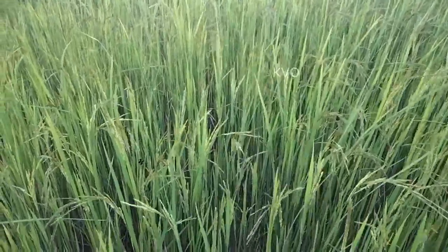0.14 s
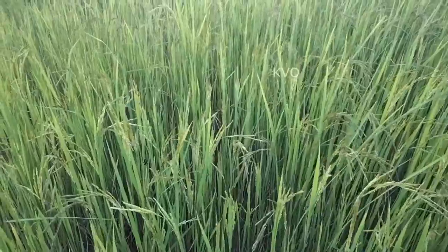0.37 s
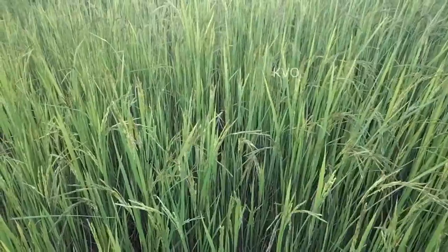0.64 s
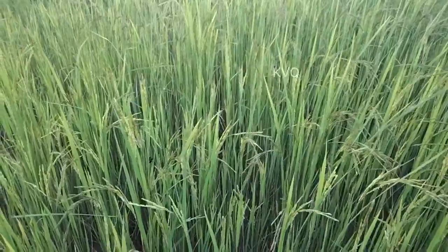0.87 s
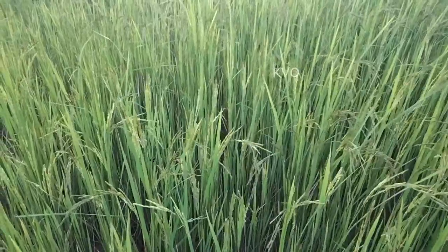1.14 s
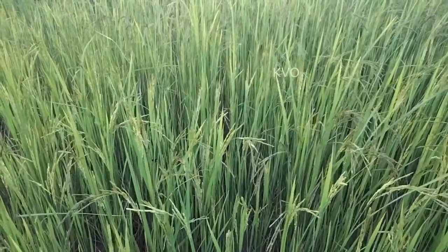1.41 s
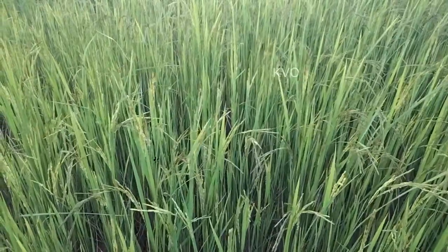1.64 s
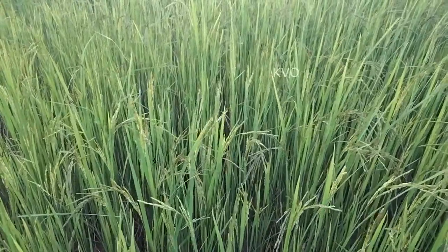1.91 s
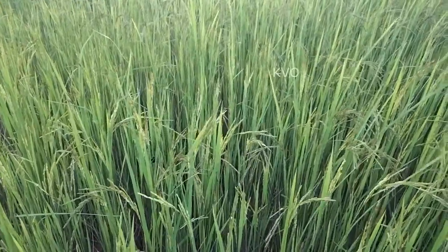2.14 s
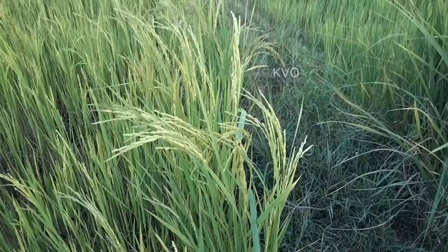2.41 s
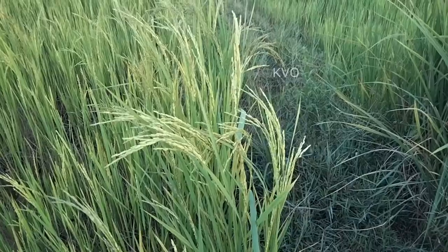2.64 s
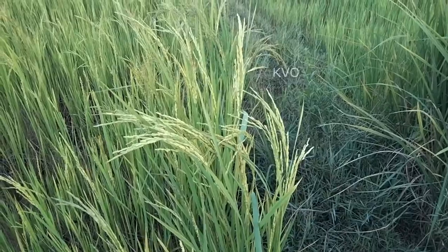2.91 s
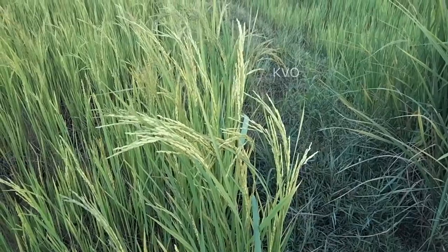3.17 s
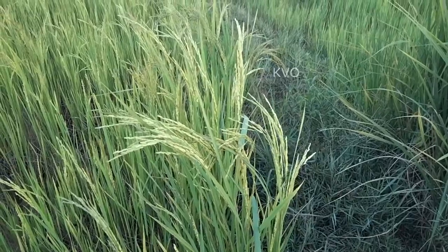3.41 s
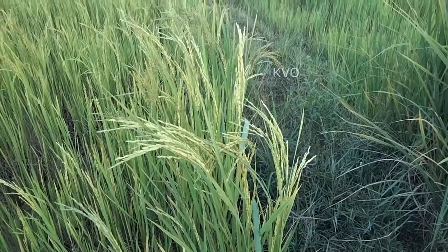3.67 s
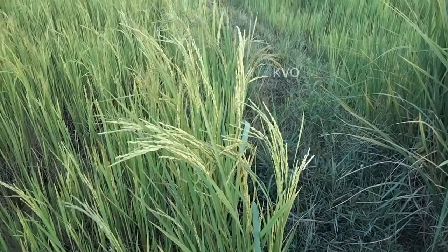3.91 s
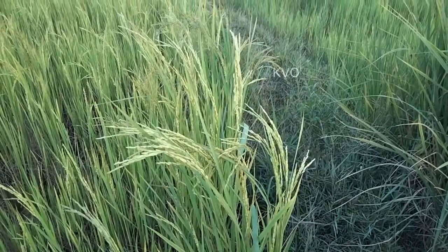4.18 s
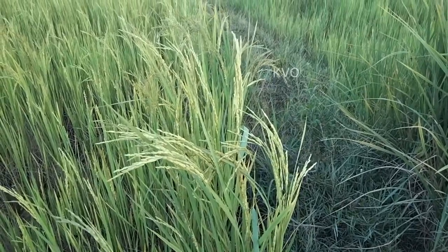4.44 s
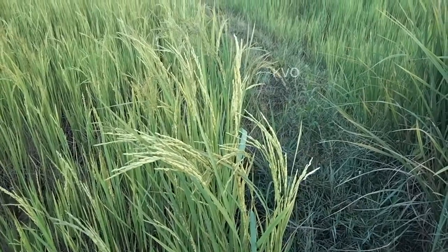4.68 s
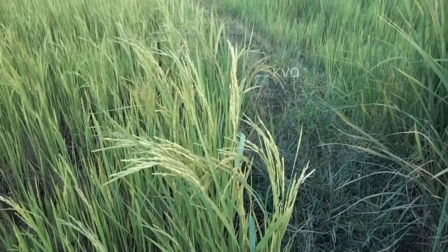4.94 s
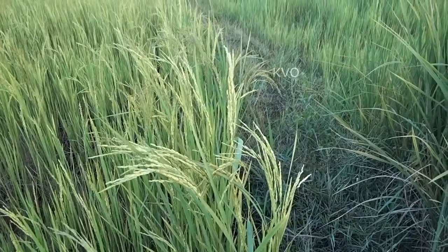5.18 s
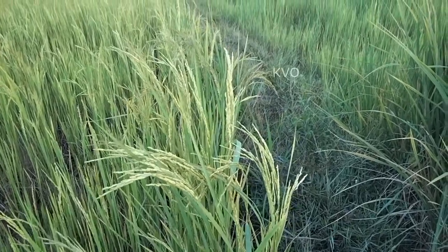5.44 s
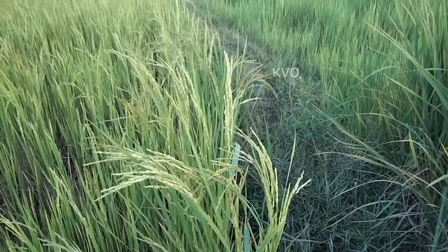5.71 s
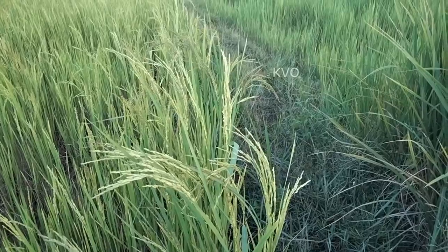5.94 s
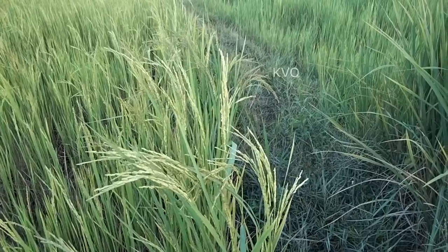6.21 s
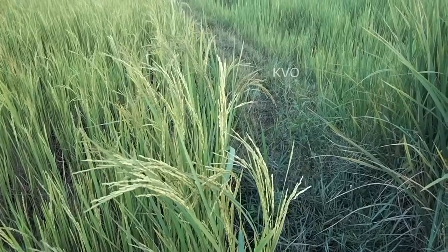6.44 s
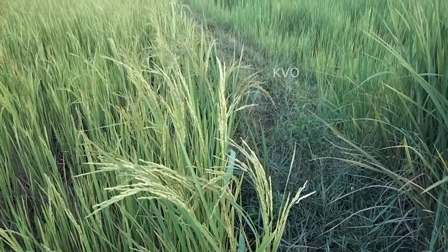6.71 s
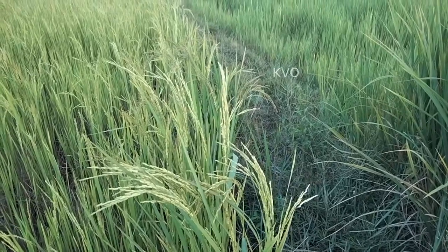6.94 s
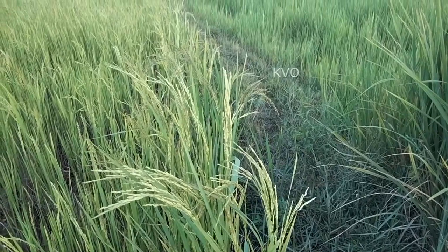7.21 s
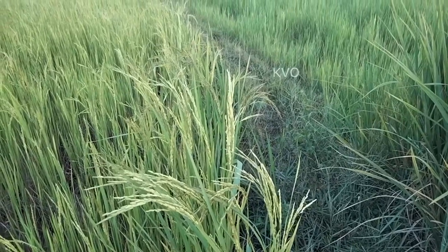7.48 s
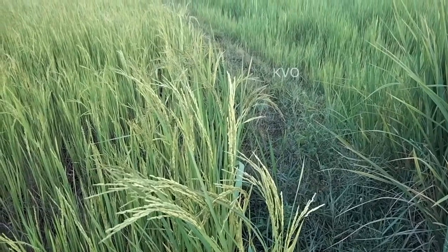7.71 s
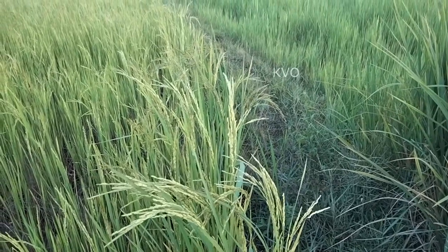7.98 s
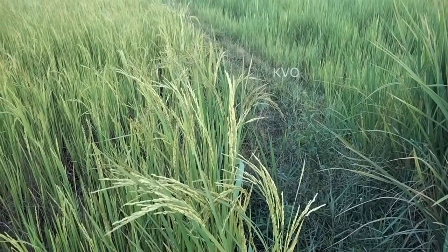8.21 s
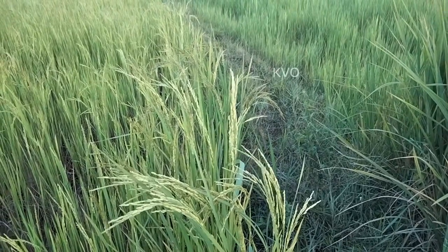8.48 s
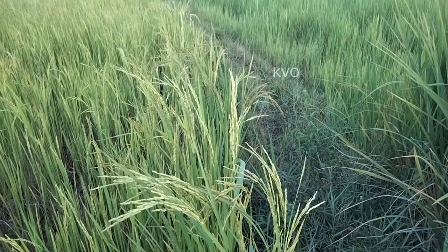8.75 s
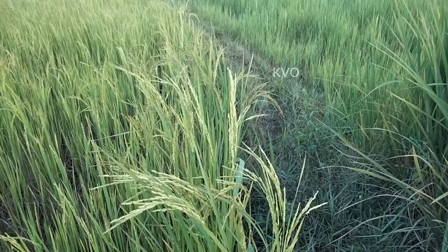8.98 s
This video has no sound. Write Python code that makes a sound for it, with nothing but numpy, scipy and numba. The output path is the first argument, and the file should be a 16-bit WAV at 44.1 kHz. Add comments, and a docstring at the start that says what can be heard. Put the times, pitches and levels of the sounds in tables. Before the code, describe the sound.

Wet field murmur with ticking drips and soft plops, as overlapping birds whistle, screech, rasp and tumble through song, ending in a rapid trill.

```python
"""A murmur of wet fields and a quick falling whistle, then a bird chorus: whistles, low coos, screeches,
rasps, a tumbling song and a closing trill. Drips, plops and splashes close by; a slow engine thumps far off.
Clear voices are gliding sines with overtones, hoarse ones chopped noise through resonances, water decaying
sines, the engine filtered impulses. Hedges and banks smear calls and water with short echoes."""
import sys
import numpy as np
from scipy import signal
from scipy.fft import rfft, irfft, next_fast_len
from scipy.io import wavfile
from scipy.ndimage import uniform_filter1d
from numba import njit

SR = 44100
rng = np.random.default_rng(int(sys.argv[2]) if len(sys.argv) > 2 else 0)


def digitize_waveform(pressure):
    """Quantize a signal to 16-bit integers and store it at the path in sys.argv[1].

    Rows of a 2-D input are taken as channels; values are limited to [-1, 1].
    """
    field = np.atleast_2d(pressure).T
    bounded = np.clip(field, -1, 1)
    quanta = np.round(bounded * 32767).astype(np.int16)
    wavfile.write(sys.argv[1], SR, quanta)


def voltage_ratio(level):
    """Linear amplitude factor for a level in decibels (scalar or array-like)."""
    return 10 ** (np.asarray(level, float) / 20)


N = 401751
t = np.arange(N) / SR

# field murmur spectrum: (frequency [Hz], relative density [dB per Hz])
FIELD_SPECTRUM = [(24, -36), (40, -25.5), (98, -3), (281, -12.5), (821, -23.5), (1090, -3.5), (1270, -12),
                  (1420, -3), (2680, -7.5), (5770, -17.5), (7500, -15.5), (9750, -43.5), (16500, -120)]
# far engine: (time [s], firing rate [1/s], level [dB])
ENGINE_COURSE = [(0.0, 5.94, -78), (1.98, 5.7, -64), (4.2, 9.0, -53), (5.0, 10.7, -64), (6.49, 13.9, -78),
                 (6.57, 11.1, -56), (6.95, 11.05, -56), (7.15, 11.0, -66), (9.11, 10.8, -63)]
# engine rumble: (time [s], level [dB])
RUMBLE_COURSE = [(0, -49), (.6, -48), (1.3, -55.5), (2.0, -61), (3.9, -60), (4.5, -54.5), (5.75, -50.5),
                 (5.85, -60), (9.11, -58)]
# clear whistles: (2nd harmonic re voice [dB], [(time [s], pitch [Hz], level [dB])])
WHISTLE_CALLS = [ (-25, [(0, 2930, -21), (0.06, 2680, -52), (0.18, 2626, -44)]), (-22, [(0, 2137, -27.5),
                 (0.07, 2150, -49), (0.2, 2300, -49)]), (-15, [(0.02, 980, -55), (0.06, 940, -43.5),
                 (0.13, 893, -47)]), (-35, [(0.82, 3060, -38), (0.85, 4500, -36), (0.89, 5300, -34),
                 (0.92, 4600, -30), (0.95, 4100, -42), (0.975, 3100, -44)]), (-40, [(1.25, 3600, -44),
                 (1.266, 3000, -26), (1.29, 2500, -40)]), (-35, [(3.845, 2600, -44), (3.87, 2270, -24.5),
                 (3.9, 1942, -18), (3.93, 1757, -26), (3.96, 1509, -25), (4.03, 1343, -21),
                 (4.1, 1344, -19.5), (4.2, 1322, -24), (4.3, 1368, -46)]), (-20, [(7.69, 3100, -36),
                 (7.72, 2592, -26), (7.77, 2700, -21), (7.81, 2860, -27), (7.835, 2740, -47)]),
                 (10, [(7.84, 1308, -48), (7.88, 1376, -37), (7.91, 1295, -33), (7.95, 1250, -46),
                 (7.985, 1206, -33)]), (-22, [(7.975, 2740, -18), (8.0, 3320, -28), (8.025, 3735, -16),
                 (8.06, 3860, -19.5), (8.1, 3730, -23)]), ]
# louder bubbles: (time [s], level [dB], start pitch [Hz], time to rise an octave [s])
LOUD_PLOPS = [(.785, -38.5, 660, 0.046), (1.033, -34.5, 685, 0.012), (1.105, -42.5, 830, 0.15),
              (1.575, -41, 692, .02), (1.711, -33.5, 786, 0.024), (1.859, -29, 674, 0.0092),
              (3.249, -40.5, 491, 0.067), (3.289, -29.5, 583, .04), (3.666, -29, 647, 0.052),
              (4.408, -28.5, 657, 0.053), (4.586, -31, 587, 0.042), (4.688, -36.5, 606, 0.038),
              (5.445, -39.5, 573, 0.066), (6.14, -40.5, 854, 0.018), (6.174, -39.5, 775, .015),
              (6.23, -41, 655, 0.049), (6.452, -43, 664, .055), (6.67, -40, 650, 0.061),
              (6.728, -41.5, 636, .11), (7.225, -40.5, 770, 0.015), (7.279, -28, 696, 0.045),
              (7.837, -33, 690, 0.0098), (8.21, -44.5, 530, .045)]
# louder drips: (time [s], level [dB], pitch [Hz])
LOUD_DRIPS = [(0.1472, -23.5, 4400), (0.3154, -24.5, 6640), (0.3535, -25, 6050), (0.5072, -30, 5470),
              (0.879, -22, 5330), (1.2008, -22, 6300), (1.2114, -19, 5550), (1.475, -23, 6550),
              (1.5984, -23, 4000), (1.62, -25, 4000), (1.8356, -27, 5610), (1.8602, -27, 5940),
              (1.9121, -28.5, 5800), (2.143, -28, 6100), (2.204, -29.5, 6750), (2.2496, -24.5, 5600),
              (2.2779, -20.5, 5900), (2.3654, -29.5, 6860), (2.4044, -25, 4800), (2.7447, -35, 4090),
              (2.797, -34, 6060), (2.844, -30, 6400), (2.9223, -35, 6600), (3.2535, -29, 6680),
              (3.3755, -30, 6950), (3.3993, -24, 6600), (4.0985, -18.5, 5930), (4.351, -23.5, 6690),
              (4.4348, -26, 7070), (4.9229, -21, 4100), (5.1411, -17, 6000), (5.156, -23, 5140),
              (5.22, -24.5, 6000), (5.944, -19.5, 5660), (5.9832, -21.5, 5700), (6.0294, -24.5, 7070),
              (6.0746, -21, 4240), (6.3753, -19.5, 5300), (6.4118, -21.5, 5820), (6.8608, -25, 6160),
              (6.895, -25.5, 5700), (7.1455, -13, 4900), (7.6896, -27, 5900)]
# louder drops striking the hollow: (time [s], level [dB])
LOUD_KNOCKS = [(0.148, -33.5), (0.1805, -37), (0.4735, -37.5), (0.835, -34.5), (1.5346, -39.5),
               (1.5653, -33.5), (2.432, -29.5), (2.9774, -38.5), (4.6637, -31.5), (5.2639, -30),
               (5.3854, -37), (5.948, -37), (5.9873, -34), (6.1345, -36), (6.199, -32), (6.3986, -25.5),
               (6.777, -42), (6.8763, -32.5), (7.9917, -31.5), (8.4332, -34), (8.7042, -26.5), (8.996, -34)]
# far doves, a list per coo: (time [s], pitch [Hz], level [dB])
DOVE_COOS = [
    [(0.12, 387, -66.5), (0.544, 401, -47), (0.8, 371, -64)],
    [(2.13, 650, -64), (2.23, 664, -52), (2.86, 532, -72)],
    [(3.67, 670.6, -41.5), (3.826, 661.3, -71), (3.84, 659.9, -83)],
    [(4.7, 630, -62.5), (5.216, 570.5, -56), (5.25, 560, -81)],
]
# hoarse screeches: (throat width [Hz], brightness [dB], [(time [s], throat centre [Hz], level [dB])])
SCREECH_CALLS = [ (950, -7, [(0.225, 2930, -34), (0.231, 2860, -23.5), (0.25, 2880, -39)]),
                 (910, -10, [(0.262, 3030, -28), (0.294, 3230, -33), (0.305, 3030, -44)]),
                 (900, -8, [(0.32, 3110, -40), (0.36, 2870, -35.5)]), (450, -8, [(.44, 2320, -48),
                 (.56, 1900, -39), (.64, 1990, -30), (.75, 2290, -32), (.85, 1790, -36), (.95, 1710, -37)]),
                 (920, -12, [(0.96, 2970, -39.5), (1.12, 2520, -34), (1.2, 2150, -60)]),
                 (910, -3, [(1.42, 2950, -70), (1.44, 2480, -42), (1.53, 2030, -61)]),
                 (910, -5, [(3.98, 2000, -42), (4.258, 2941, -26), (4.36, 2780, -85)]),
                 (920, -16, [(8.09, 2740, -25.5), (8.182, 2680, -17.5), (8.24, 2540, -45)]),
                 (620, -16, [(8.39, 2500, -26), (8.42, 2640, -18), (8.51, 2810, -20), (8.57, 3400, -17),
                 (8.62, 3700, -26)]), (700, -20, [(8.5, 2480, -37), (8.6, 2550, -23), (8.73, 2530, -23.5),
                 (8.76, 2390, -45)]), ]
# falling call moving into its octave: (time [s], pitch [Hz], fundamental [dB], octave [dB])
FALLING_ROWS = [(1.46, 2006, -50, -40), (1.49, 2065, -35.5, -52), (1.56, 2048, -48, -47),
                (1.61, 1897, -52, -36), (1.71, 1645, -53, -35.5), (1.75, 1496, -54, -34.5),
                (1.79, 1566, -51, -50), (1.86, 1530, -48, -46)]
# rasping calls: (start [s], peak [s], end [s], peak level [dB])
RASP_CALLS = [(2.47, 2.575, 2.64, -22), (2.94, 3.085, 3.17, -18), (3.46, 3.6, 3.67, -20.5),
              (5.56, 5.7, 5.82, -21), (6.53, 6.7, 6.77, -21.5), (8.24, 8.37, 8.48, -16)]
# rasp throat resonances: (centre [Hz], width [Hz], relative level [dB])
RASP_RESONANCES = [(1250, 110, -7), (1900, 1500, -2), (2790, 100, -13), (3755, 640, 3), (5410, 1050, -2),
                   (6470, 630, -9), (9750, 4600, -9), (14400, 2000, -13)]
# low rasp resonances as the throat closes: (start [dB], peak [dB], end [dB])
RASP_LOW_DB = (-2, -10.5, -14)
# rasp resonances rising as the neck shortens: (start [ratio], peak [ratio], end [ratio])
RASP_SHIFT_RATIO = (.95, 1.03, 1.04)
# song phrases: (opening note [s], its level [dB], first tumbling note [s], last [s]); lone notes: first two
SONG_PHRASES = [(4.5933, -26, 4.6444, 4.7174), (4.9349, -22, 4.9922, 5.0659),
                (5.288, -31.5, 5.3564, 5.4396), (5.7214, -28.5, 5.771, 5.8511),
                (6.0677, -28.5, 6.1276, 6.199), (6.5207, -30, 6.5798, 6.6584), (6.936, -31, 7.0034, 7.0452),
                (7.9823, -26), (8.0994, -15.5)]
# song notes, before scatter: (climb from [Hz], climb to [Hz], plunge from [Hz], landing [Hz], warble [0-1])
SONG_NOTES = [(3750, 4150, 4100, 3300, 0.03), (3200, 4150, 4700, 2450, 0.15),
              (3210, 3500, 4200, 1950, 0.16), (2500, 3900, 3200, 2050, 0.23)]
# successive tumbling notes: (level [dB])
TUMBLE_LEVELS_DB = [-15.5, -16, -17.5]
# each climb re its note: (start [dB], middle [dB], end [dB])
CLIMB_LEVELS_DB = [(-9, -4, -8), (-7, -6, -9), (-2, -4.5, -12), (-2, -5, -12)]
# held notes closing phrases: (time [s], length [s], held pitch [Hz], level [dB], late pitch rise [Hz])
CLOSING_NOTES = [(4.735, .11, 2470, -21, 30), (5.07, .11, 2345, -23, 20), (5.435, .115, 2325, -24, 300),
                 (5.85, .115, 2345, -22, 220), (6.2, .13, 2185, -25, 250), (6.66, .13, 2230, -24, 200)]
# shape of a held note: (share of length [0-1], pitch [ratio], share of rise [0-1], relative level [dB])
HELD_SHAPE = [(0, .94, 0, -6), (.22, 1.001, 0, 1), (.52, 1.002, .05, -2), (.64, 1.003, 1, -3),
              (1, .99, .6, -40)]
# overtones of a held note re its voice: (level [dB])
HELD_OVERTONES_DB = [-20, -26, -22, -36, -24]
# arching cry: (time [s], pitch [Hz], level [dB])
BRIGHT_ROWS = [(7.08, 2200, -30), (7.13, 2440, -23), (7.18, 2510, -19), (7.205, 2230, -21),
               (7.245, 1672, -20), (7.3, 1439, -19), (7.33, 1700, -21), (7.37, 2330, -23),
               (7.42, 2500, -22), (7.46, 2400, -18), (7.49, 1900, -20), (7.54, 1540, -20), (7.6, 1300, -29)]
# its overtones re the voice: (level [dB])
BRIGHT_OVERTONES_DB = [1, -7, -11, -15, -12]
# its harmonics' gain by frequency, with a lift near 7.3 kHz: (frequency [Hz], gain [dB])
BRIGHT_HARMONIC_GAIN = [(1300, -11), (1700, -15), (2500, -4), (3000, 0), (4000, -4), (5000, -3), (6000, -9),
                        (7300, 3), (9000, -9), (12000, -2)]
# trill course: (time [s], lowest pitch [Hz], level [dB], upper voice [dB])
TRILL_COURSE = [(8.6, 3540, -17, -22), (8.68, 3570, -18, -18.5), (8.77, 3500, -15, -19),
                (8.79, 3050, -16, -19.5), (8.87, 2900, -13.5, -24), (8.96, 2860, -14.5, -24),
                (8.99, 3100, -14.5, -26), (9.1, 2850, -12.5, -28)]
# overall treble response: (frequency [Hz], gain [dB])
TREBLE_GAIN = [(7200, 2), (7900, -11), (12000, -14.5), (13600, -28.5), (15000, -9), (15600, -23.5),
               (15900, -75)]


@njit
def moving_resonance(x, hz, width_hz):
    """State-variable band-pass with a moving centre, gain 1 there."""
    y, b, l = np.empty(len(x)), 0., 0.
    for i in range(len(x)):
        g, k = np.tan(np.pi * hz[i] / SR), width_hz[i] / hz[i]
        v = (b + g * (x[i] - l)) / (1 + g * (g + k))
        b, l, y[i] = 2 * v - b, l + 2 * g * v, k * v
    return y


def ring(x, hz, width_hz):
    """Fixed two-pole band-pass, gain 1 at the centre."""
    g = np.tan(np.pi * hz / SR)
    damp = g * width_hz / hz
    feedback = [1 + damp + g * g, 2 * (g * g - 1), 1 - damp + g * g]
    return signal.lfilter([damp, 0, -damp], feedback, x)


def band(x, hz, width_hz):
    """Steep band-pass: a fixed or moving resonance applied twice."""
    if np.ndim(hz):
        widths_hz = width_hz + 0 * x
        return moving_resonance(moving_resonance(x, hz, widths_hz), hz, widths_hz)
    return ring(ring(x, hz, width_hz), hz, width_hz)


def unit(x):
    """Scale to rms 1."""
    return x / np.sqrt(np.mean(x ** 2))


def walk(rate_hz, size=N):
    """Smooth random wander of rms 1."""
    k = max(int(SR / rate_hz), 1)
    return unit(uniform_filter1d(uniform_filter1d(rng.standard_normal(size), k), k))


def colour(x, points):
    """Filter by (frequency [Hz], gain [dB]) points on a log axis."""
    hz, db = np.transpose(points)
    size = next_fast_len(x.shape[-1] + SR // 10)
    f = np.fft.rfftfreq(size, 1 / SR)
    gain = voltage_ratio(np.interp(np.log(f + 1), np.log(hz), db))
    return irfft(rfft(x, size) * gain, size)[..., :x.shape[-1]]


def read(rows, fade_s):
    """Slice of a call, its soft edges and its columns per sample."""
    s, *cols = np.transpose(rows)
    span = slice(max(int(s[0] * SR), 0), min(int(s[-1] * SR), N))
    edge = np.clip(np.minimum(t[span] - s[0], s[-1] - t[span]) / fade_s, 0, 1)
    return span, edge, [np.interp(t[span], s, c) for c in cols]


def sing(out, rows, overtones_db, waver=.004, flutter_db=3.5, husk_rad=0., ease_s=.001, warble=0.,
         pipe=((1, 0),)):
    """Add a gliding sine with overtones; muscles round the glides, husk roughens the overtones most."""
    span, edge, (hz, db, *given_db) = read(rows, fade_s=0.0029)
    size = len(hz)
    hz = uniform_filter1d(hz, int(ease_s * SR), mode="nearest")
    warble_phase = 2 * np.pi * 105 * (t[span] - t[span][0]) + 1.16 * walk(90.2, size)
    hz = hz * (1 - warble * np.cos(warble_phase))
    phase = 2 * np.pi * np.cumsum(hz * (1 + waver * walk(152, size))) / SR
    phase = phase + husk_rad * walk(2500, size)
    # overtones follow the last level column given
    levels_db = [db] + given_db + [(given_db or [db])[-1] + o for o in overtones_db]
    tone = np.zeros(size)
    for k, level_db in enumerate(levels_db, start=1):
        gain = voltage_ratio(level_db + np.interp(k * hz, *np.transpose(pipe)))
        tone += gain * np.sin(k * phase) * (k * hz < .45 * SR)
    flutter = voltage_ratio(flutter_db * np.clip(walk(73, size), -2, 1.5))
    out[span] += np.sqrt(2) * edge * tone * flutter


def hoarse(rate_hz, depth):
    """Breath noise chopped by irregularly flapping membranes."""
    phase = np.cumsum(rate_hz * (1 + 0.17 * walk(60))) / SR % 1
    flaps = 1 - depth + depth * 2 * np.exp(-phase / 0.85)
    return rng.standard_normal(N) * flaps * voltage_ratio(2.64 * walk(135))


def echo(x, t60_s, wet_db, delay_s=0.0045):
    """Scattered reflections: a decaying noise tail behind the direct sound."""
    u = t[:SR // 2]
    tail = rng.standard_normal(len(u)) * voltage_ratio(-60 * u / t60_s) * (u > delay_s)
    tail /= np.sqrt(np.sum(tail ** 2))
    return x + voltage_ratio(wet_db) * signal.fftconvolve(x, tail)[:N]


def field():
    """Distant murmur: noise whose half-octave bands swell separately and share a rustle, weaker down low."""
    air = unit(colour(rng.standard_normal(N), FIELD_SPECTRUM))
    rustle_db = 4 * walk(45)
    murmur = np.zeros(N)
    for hz in 60 * 2 ** np.arange(0, 7.1, .5):
        swell_db = min(hz / 2000, 1) * rustle_db + 4.1 * walk(6.2)
        murmur += band(air, hz, hz / 2) * voltage_ratio(swell_db)
    return voltage_ratio(-52) * murmur


def engine():
    """Slow single firings ring a dull thump; a noise rumble has its own swell."""
    s, rate_hz, db = np.transpose(ENGINE_COURSE)
    cycles = 0.39 + np.cumsum(np.interp(t, s, rate_hz)) / SR
    fired = np.diff(np.floor(cycles), prepend=0) * voltage_ratio(0.83 * walk(8.6))
    thump = unit(band(fired, 77.4, 28.)) + voltage_ratio(-11) * unit(band(fired, 125., 85.0))
    noise = rng.standard_normal(N)
    rumble = unit(band(noise, 120., 120.0)) + voltage_ratio(-5.0) * unit(band(noise, 284.0, 370.0))
    rumble_db = np.interp(t, *np.transpose(RUMBLE_COURSE))
    return voltage_ratio(np.interp(t, s, db)) * thump + voltage_ratio(rumble_db) * rumble


def whistles():
    """Clear gliding voices with two overtones."""
    out = np.zeros(N)
    for second_db, call in WHISTLE_CALLS:
        # short calls are pressed out unsteadily, long ones settle
        waver = .012 if call[-1][0] - call[0][0] < .3 else .002
        sing(out, call, [second_db, second_db - 18], waver, husk_rad=0.073, ease_s=0.012)
    return out


def coos():
    """Far doves: low voices, nearly pure, strongly fluttering in level."""
    out = np.zeros(N)
    for call in DOVE_COOS:
        sing(out, call, [-25], waver=0.016, flutter_db=7.0)
    return out


def water():
    """Bubbles glide up ever faster until they burst; drips tick; both, and knocks, wake a hollow nearby."""
    bubbles, ticks, knocks = np.zeros((3, N + SR))
    chance = rng.random((500, 4))
    # random small drops, mostly faint: (time [s], level [dB], chance, chance)
    small = np.c_[chance[:, 0] * N / SR, -54 - 12.5 * np.log10(chance[:, 1] + .01), chance[:, 2:]]
    far = [(s, db - 4, 450 + 900 * a, 0.012 + 0.03 * b) for s, db, a, b in small[:45]]
    u = t[:SR // 8]
    for s, db, hz, octave_s in [*LOUD_PLOPS, *far]:
        rise = (u / octave_s) ** 2
        phase = 2 * np.pi * np.cumsum(hz * 2 ** np.minimum(rise, 2)) / SR
        fade_db = -60 * u / .3 - 9 * rise ** 3
        bubbles[int(s * SR):][:len(u)] += voltage_ratio(db + fade_db) * np.sin(phase) * np.minimum(u / 0.0014, 1)
    u = t[:SR // 50]
    small_drips = [(s, db, 3500 + 4500 * a) for s, db, a, _ in small]
    for s, db, hz in [*LOUD_DRIPS, *small_drips]:
        tick = np.sin(2 * np.pi * hz * u) + 1.3 * (u == u[1])  # ringing plus a click
        ticks[int(s * SR):][:len(u)] += voltage_ratio(db - 60 * u / 0.0078) * tick
    ticks = colour(ticks, [(700, -34), (3000, 3.5), (7000, 1), (9000, 10.5)])
    hollow_hz = 1283.
    for s, db in [*LOUD_KNOCKS, *small[-70:, :2]]:
        knocks[int(s * SR):][:len(u)] += voltage_ratio(db - 60 * u / 0.01) * np.sin(2 * np.pi * hollow_hz * u)
    hollow = ring(ticks + bubbles + knocks, hollow_hz, 70.)
    return (bubbles + ticks + 0.31 * knocks + voltage_ratio(19) * hollow)[:N]


def spray():
    """Tiny splashes: thin high ticks over a faint flickering hiss."""
    when, size, pitch = rng.random((260, 3)).T
    out, u = np.zeros(N + SR), t[:SR // 100]
    levels_db = -50 - 14 * np.log10(size + .01)
    for s, db, hz in zip(when * N / SR, levels_db, 9000 + 6000 * pitch):
        out[int(s * SR):][:len(u)] += voltage_ratio(db - 60 * u / .004) * np.sin(2 * np.pi * hz * u)
    hiss = unit(band(rng.standard_normal(N), 12500., 7000.))
    return out[:N] + voltage_ratio(-60) * hiss * voltage_ratio(4 * walk(9))


def screeches():
    """Chopped breath in a moving throat resonance, with its overtones and a bright skirt."""
    breath, out = hoarse(230, 0.37), np.zeros(N)
    for width_hz, bright_db, call in SCREECH_CALLS:
        span, edge, (hz, db) = read(call, fade_s=0.018)
        x = breath[span]
        throat = unit(band(x, hz, width_hz))
        bright = unit(band(x, 2 * hz, 2.5 * width_hz))
        bright += voltage_ratio(-1.5) * unit(band(x, 6460.0, 3300.0))
        bright += voltage_ratio(-1.5) * unit(band(x, 10700.0, 10000.0))
        out[span] += edge * voltage_ratio(db) * (throat + voltage_ratio(bright_db) * bright)
    return out


def falling_call():
    """A falling voice whose strength moves between fundamental and octave."""
    out = np.zeros(N)
    sing(out, FALLING_ROWS, [-24, -31], waver=0.008, flutter_db=4.5, husk_rad=0.069, ease_s=0.02)
    return out


def rasps():
    """Chopped breath through a throat that closes and shortens during each call."""
    breath, out = hoarse(127, .8), np.zeros(N)
    for *times, peak_db in RASP_CALLS:
        effort_db = (peak_db - 22, peak_db, peak_db - 19)
        rows = list(zip(times, effort_db, RASP_LOW_DB, RASP_SHIFT_RATIO))
        span, edge, (db, low_db, shift) = read(rows, fade_s=0.03)
        for hz, width_hz, ring_db in RASP_RESONANCES:
            voice = unit(band(breath[span], hz * (shift if hz > 1500 else 1), width_hz))
            out[span] += edge * voltage_ratio(db + ring_db + low_db * (hz < 4500)) * voice
    return out


def song():
    """Each note warbles fast while it climbs, then plunges cleanly within 18 ms."""
    out = np.zeros(N)
    for opening, opening_db, *tumble in SONG_PHRASES:
        times = [opening]
        if tumble:
            times += list(np.linspace(*tumble, 1 + round(np.ptp(tumble) / .039)))
        previous = [opening - .024, *times]
        levels_db = [opening_db, *TUMBLE_LEVELS_DB]
        for before, s, db, note, climb_db in zip(previous, times, levels_db, SONG_NOTES, CLIMB_LEVELS_DB):
            *pitches_hz, warble = note
            scatter = 1 + .025 * rng.standard_normal(4)
            from_hz, to_hz, top_hz, low_hz = np.array(pitches_hz) * scatter
            start = before + .004
            a_db, b_db, c_db = climb_db
            climb = [(start, from_hz, db + a_db),
                     ((start + s) / 2, (from_hz + to_hz) / 2, db + b_db),
                     (s - .006, to_hz, db + c_db)]
            sing(out, climb, [-13.5, -17.5, -15, -44], waver=0.023, flutter_db=5.5, husk_rad=0.093,
                 warble=warble)
            plunge = [(s - .01, top_hz, db - 5),
                      (s, 0.37 * top_hz + .7 * low_hz, db - 1.5),
                      (s + .008, low_hz, db - 5.5)]
            sing(out, plunge, [-19, -19, -16], waver=0.025, husk_rad=.09)
    return colour(out, [(1500, -25), (1900, -2)])


def closings():
    """Held notes that close song phrases: the first two nearly flat, the later ones flick upward."""
    out = np.zeros(N)
    for s, length_s, hz, db, rise_hz in CLOSING_NOTES:
        note = [(s + share * length_s, hz * ratio + up * rise_hz, db + shape_db)
                for share, ratio, up, shape_db in HELD_SHAPE]
        sing(out, note, HELD_OVERTONES_DB, waver=.006, flutter_db=2.5, husk_rad=.04, ease_s=0.01)
    return out


def bright_call():
    """An arching cry: a long row of rough harmonics whose strength depends on their frequency."""
    out = np.zeros(N)
    sing(out, BRIGHT_ROWS, BRIGHT_OVERTONES_DB, waver=0.01, flutter_db=4.5, husk_rad=0.069, ease_s=0.02,
         pipe=BRIGHT_HARMONIC_GAIN)
    return out


def trill():
    """Notes drop from the top and warble away; the syrinx's other side buzzes high in the same rhythm."""
    out, gate = np.zeros(N), np.zeros(N)
    times, *columns = np.transpose(TRILL_COURSE)
    top_hz = 4120
    for s in np.arange(8.599, N / SR - .02, .0393):
        shift, stronger = rng.standard_normal(2)
        low_hz, db, upper_db = (np.interp(s, times, c) for c in columns)
        s, db = s + .0012 * shift, db + 1.2 * stronger
        drop = [(s - .003, top_hz, db), (s + 0.00355, 1.07 * low_hz, db + .6), (s + .014, low_hz, db - 2.5)]
        sing(out, drop, [-20, -12], waver=0.0071)
        mid_hz = (low_hz + top_hz) / 2
        away = [(s + 0.0067, mid_hz, db - .6), (s + 0.035, 0.95 * mid_hz, db - 11)]
        sing(out, away, [-16, -12], husk_rad=0.078, warble=.8 * (1 - low_hz / mid_hz))
        near = slice(int((s - .06) * SR), None)
        gate[near] += voltage_ratio(upper_db) * np.exp(-((t[near] - s + 0.0096) / 0.011) ** 2)
    noise = rng.standard_normal(N)
    buzz = unit(band(noise, 5100., 1600.0))
    buzz += voltage_ratio(-6.0) * unit(band(noise, 6020.0, 490.0))
    buzz += voltage_ratio(-11) * unit(band(noise, 12000.0, 10000.0))
    return colour(out, [(2200, -25), (2700, -4.5)]) + gate * buzz


def scene():
    """Clear voices are near, song and trill sit deep in the bushes."""
    clear = whistles() + falling_call() + closings() + bright_call()
    clear = colour(clear, [(550, -39.5), (850, 1)]) + coos()
    near = echo(clear, 0.2, -4, delay_s=0.0079) + echo(screeches() + rasps(), .19, -6)
    bushes = echo(song(), .17, -2) + echo(trill(), .13, -2)
    wet = echo(water() + spray(), 0.064, -7)
    return (field() + engine() + near + wet + bushes)[None]


def low_pass(x):
    """Removes everything above the highest recorded frequency."""
    return signal.sosfilt(signal.butter(12, 16800, fs=SR, output="sos"), x)


def record(dry):
    """Overall tone: treble dull above 7.5 kHz, almost nothing near 16 kHz."""
    mix = colour(dry, TREBLE_GAIN)
    return low_pass(mix)


dry = scene()
out = record(dry)
digitize_waveform(out)
```